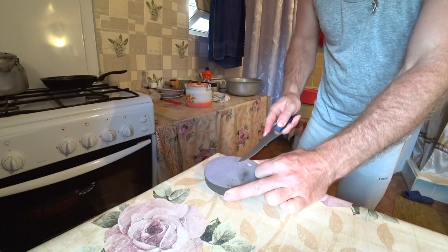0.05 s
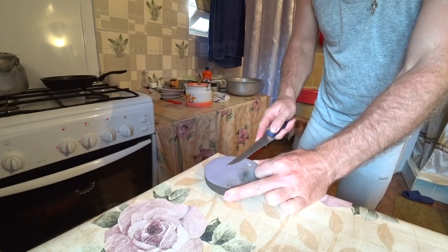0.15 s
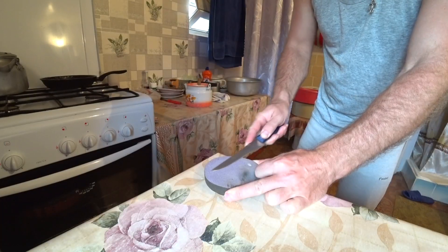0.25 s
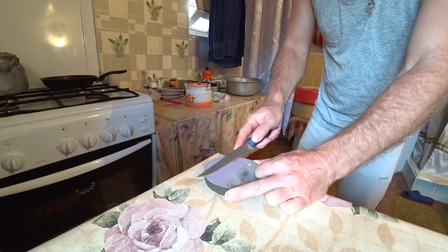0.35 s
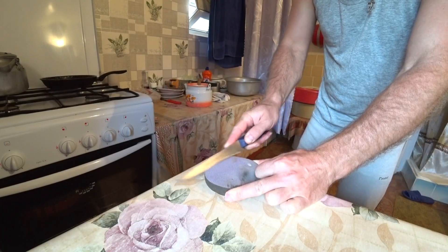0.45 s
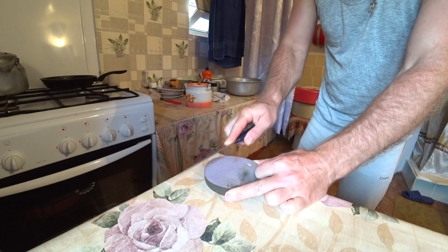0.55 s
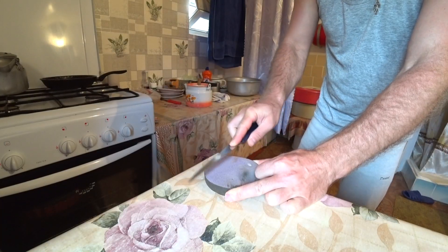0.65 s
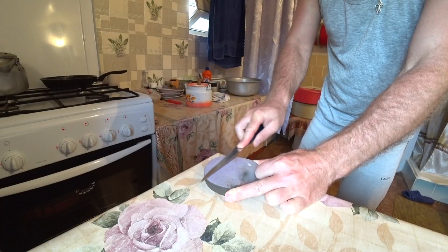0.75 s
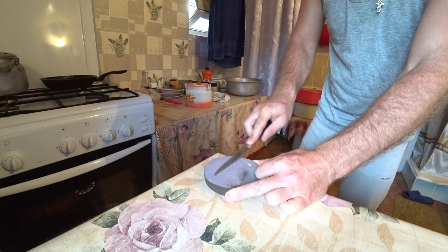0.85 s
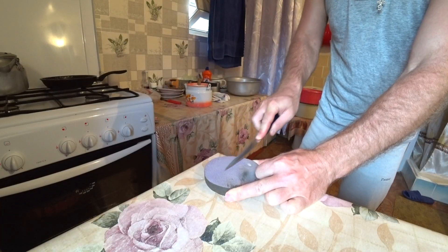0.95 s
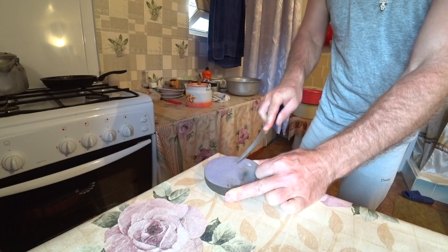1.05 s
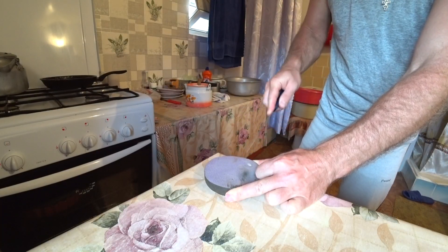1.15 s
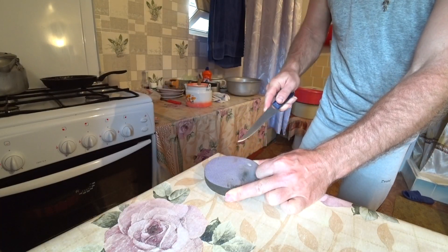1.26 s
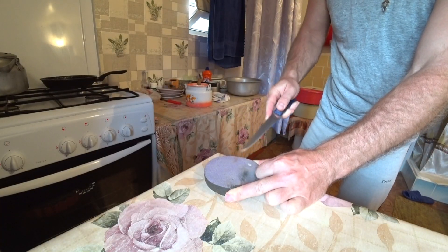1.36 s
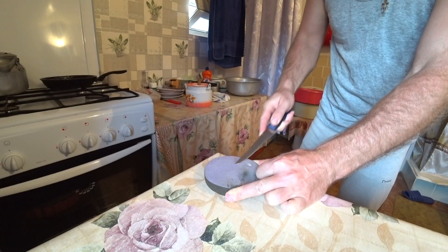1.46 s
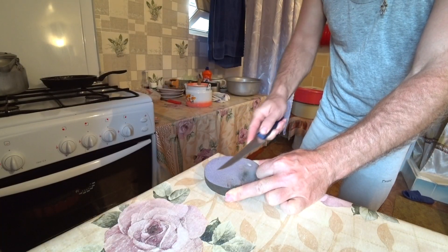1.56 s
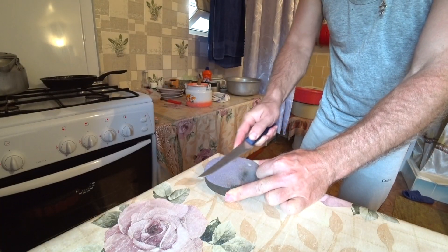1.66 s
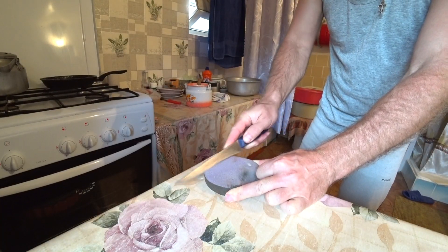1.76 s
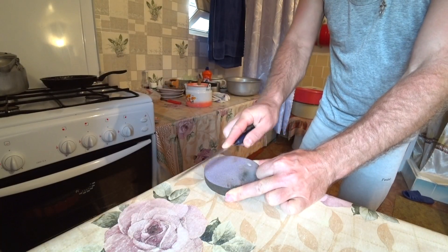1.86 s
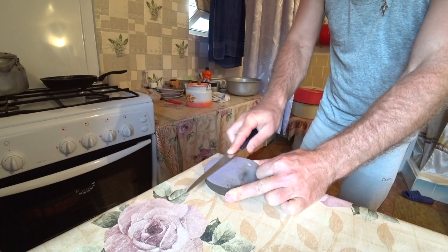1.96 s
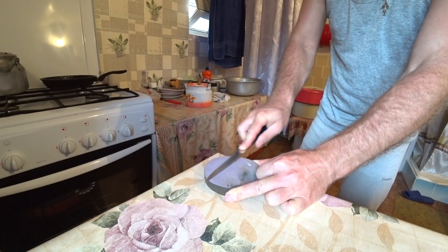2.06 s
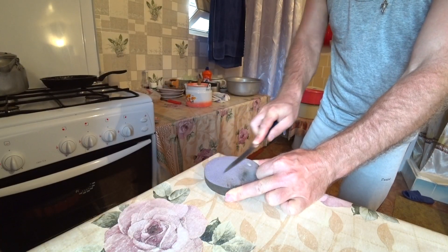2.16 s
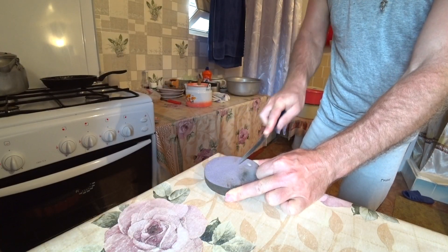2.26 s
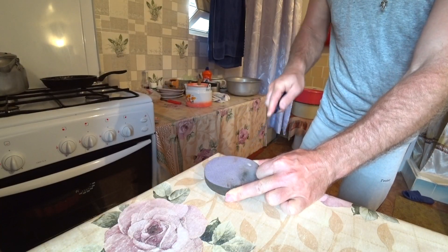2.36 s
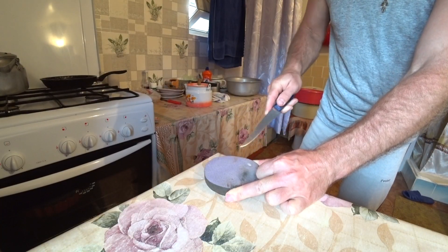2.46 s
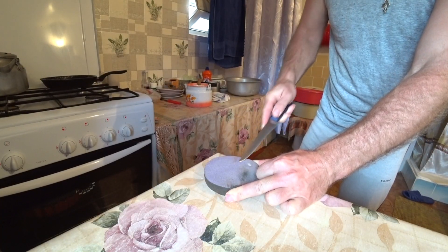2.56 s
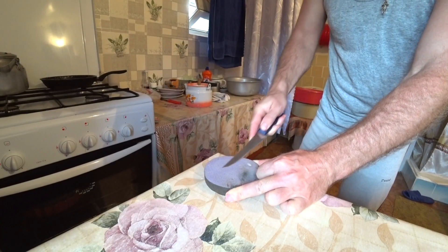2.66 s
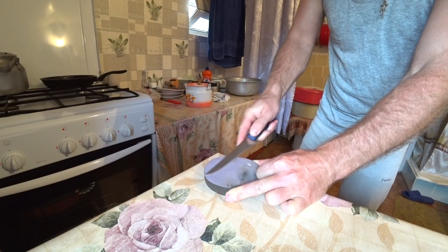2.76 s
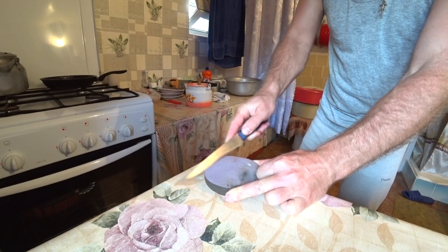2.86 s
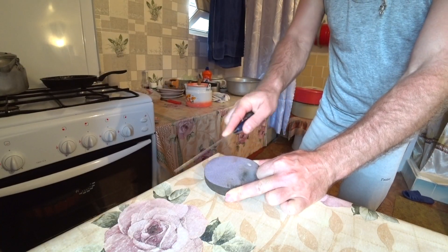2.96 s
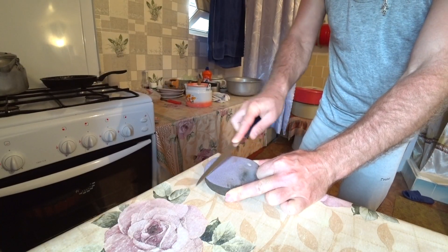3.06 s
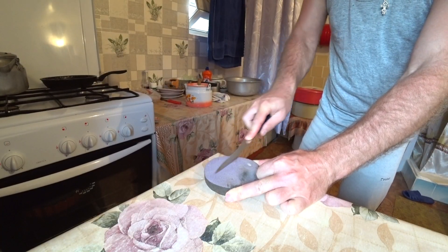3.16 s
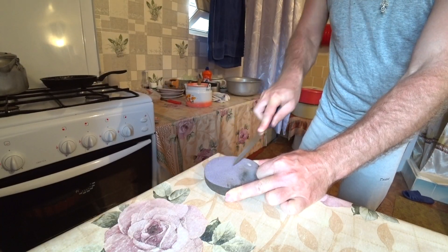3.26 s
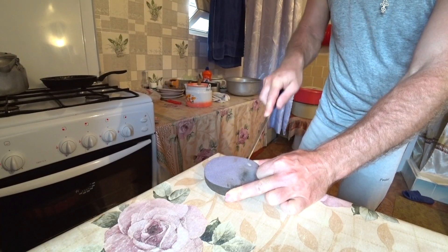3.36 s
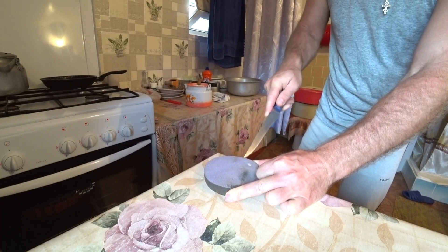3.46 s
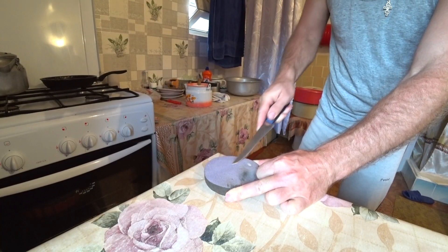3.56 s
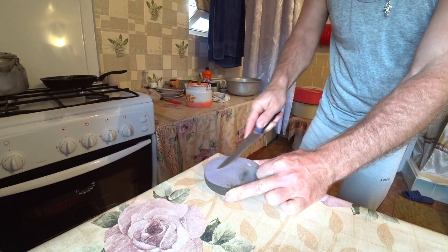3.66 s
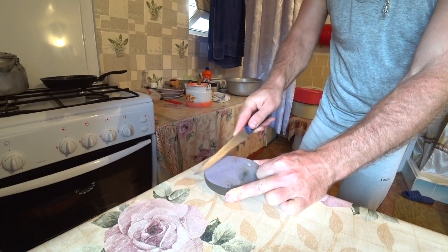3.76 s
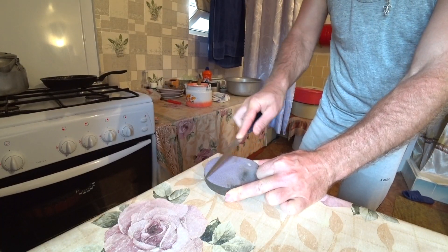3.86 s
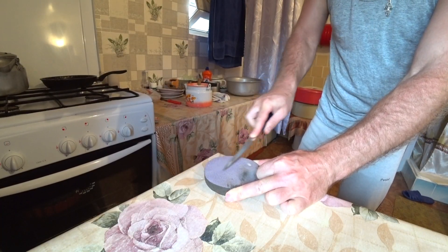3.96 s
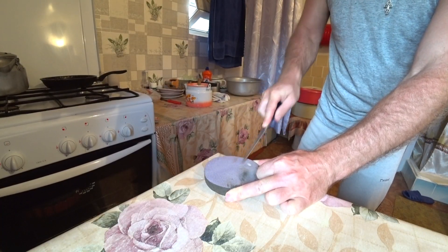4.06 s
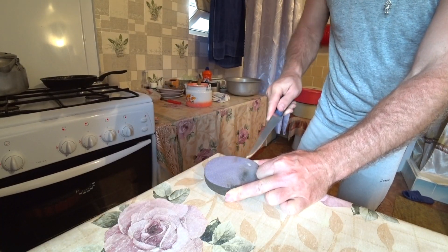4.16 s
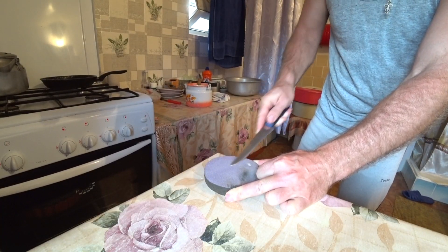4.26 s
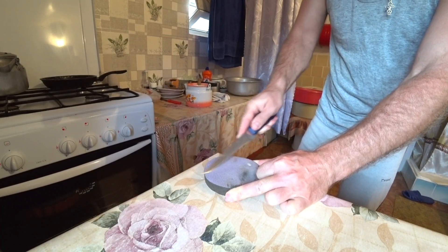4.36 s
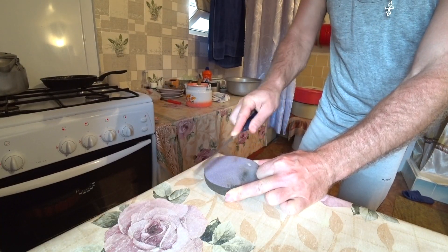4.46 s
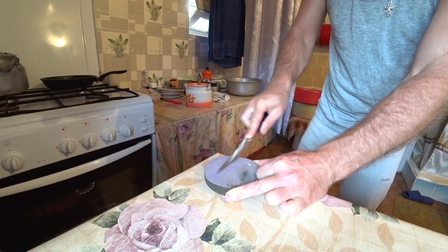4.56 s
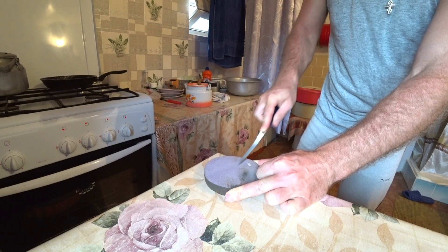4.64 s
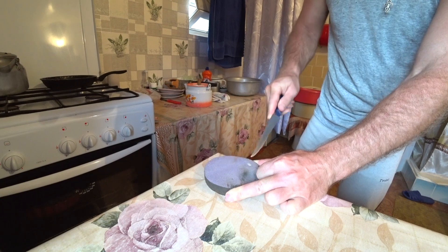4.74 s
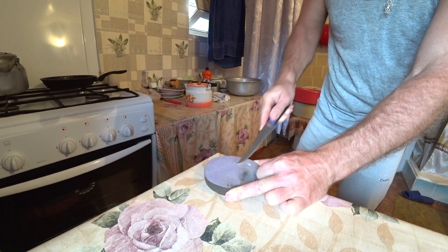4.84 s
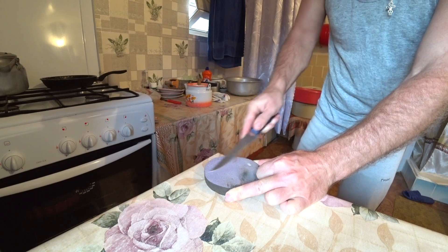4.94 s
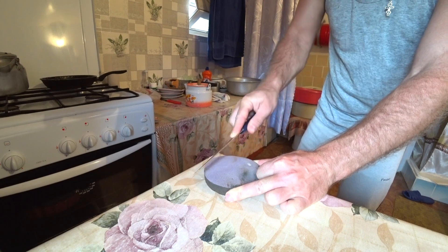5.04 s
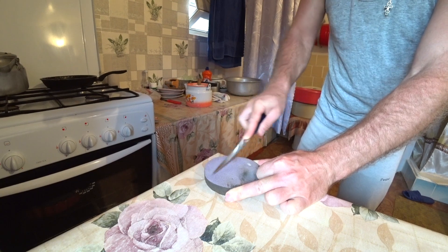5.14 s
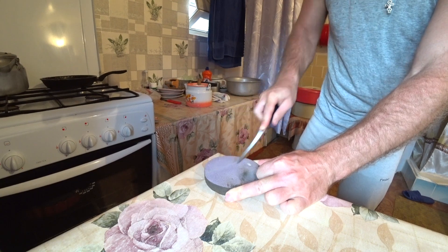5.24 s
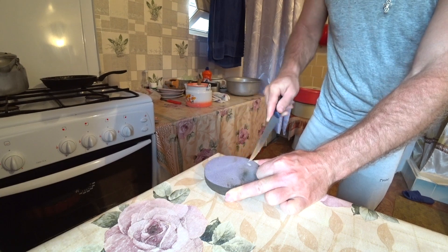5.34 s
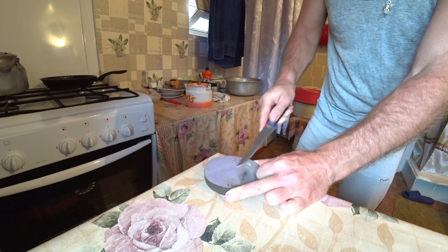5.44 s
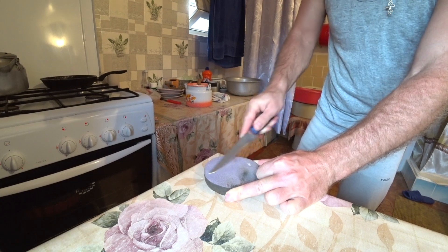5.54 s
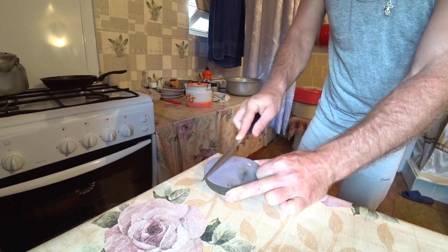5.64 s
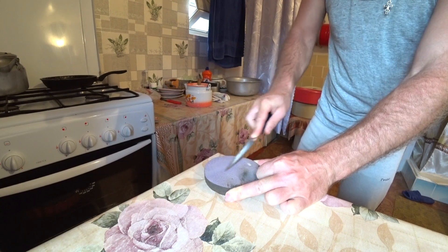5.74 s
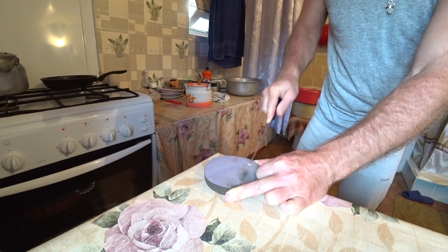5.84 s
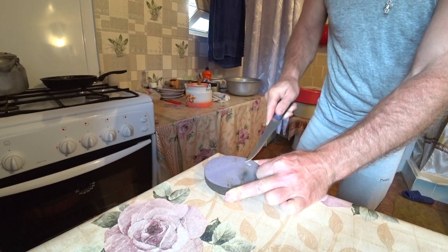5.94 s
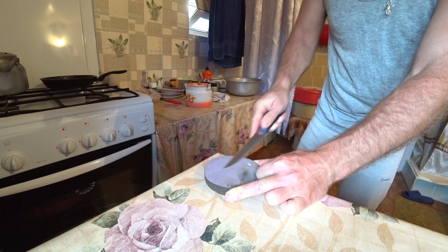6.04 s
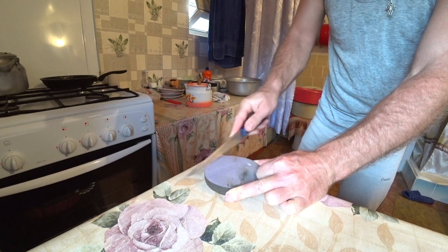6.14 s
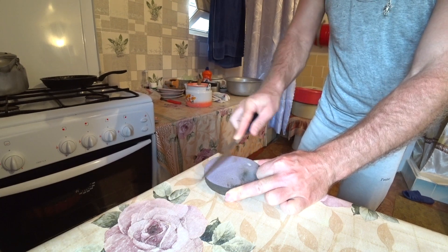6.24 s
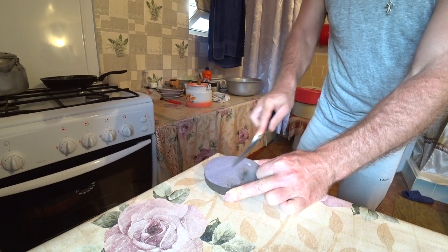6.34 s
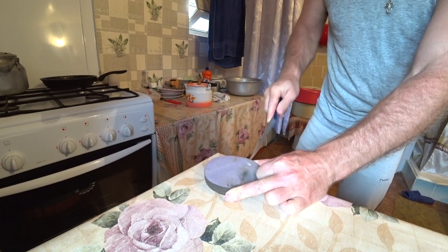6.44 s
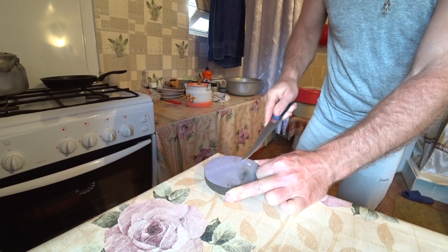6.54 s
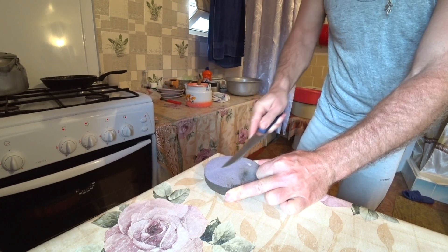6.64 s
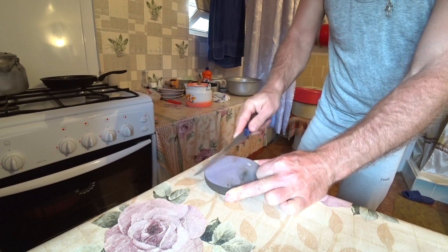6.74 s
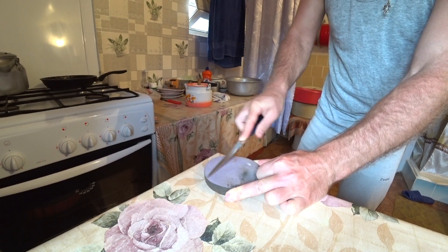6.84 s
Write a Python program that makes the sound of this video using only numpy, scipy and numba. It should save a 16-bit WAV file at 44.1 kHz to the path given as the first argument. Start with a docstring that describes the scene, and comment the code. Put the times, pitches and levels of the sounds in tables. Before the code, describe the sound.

A steel knife rasps back and forth over a sharpening stone, with sharp ticks and quickening strokes in a small kitchen.

```python
"""A steel kitchen knife drawn over a round whetstone on a cloth-covered table, push and pull in turn.
The edge lands with a tick, grit rasps it and rings the blade, large grains snap, the table rumbles
under the stone, and the tip flicks off the rim. A small tiled kitchen answers, over quiet room air
and a low hum from outside."""
import sys
import numpy as np
from scipy import signal
from scipy.fft import rfft, irfft, next_fast_len
from scipy.io import wavfile
from scipy.ndimage import uniform_filter1d
from numba import njit

SR = 44100
rng = np.random.default_rng(int(sys.argv[2]) if len(sys.argv) > 2 else 0)


def transcribe(signal):
    """Save signal, clipped to [-1, 1], as a 16-bit WAV file at the path in sys.argv[1]."""
    frames = np.atleast_2d(signal).T
    limited = np.clip(frames, -1, 1)
    pcm = np.round(limited * 32767).astype(np.int16)
    wavfile.write(sys.argv[1], SR, pcm)


N = 304290

# table resonances: pitch_hz, width_hz, level_db
TABLE_MODES = [(54.4, 28, -6.5), (111.7, 30, -7), (209, 84, -3.5), (288.3, 43, -4), (413.3, 88, -1.5),
               (491, 35.4, -0.5), (558.6, 86, -3.5), (711.4, 32, 1), (900, 170, -1)]
# whetstone resonances: pitch_hz, width_hz, level_db
STONE_MODES = [(1218, 41, 1.5), (1487, 160, 8.5), (1722, 61, 3.5), (1945, 180, 5.5), (2420, 310, 5.5)]


def undb(db):
    """Decibels to gain."""
    return 10 ** (np.asarray(db) / 20)


def unit(x):
    """Scale to rms 1."""
    return x / np.sqrt(np.mean(x ** 2))


def walk(rate_hz):
    """Random steps, smoothed twice; spread near 1."""
    hold = int(SR / rate_hz)
    steps = np.repeat(rng.standard_normal(N // hold + 1), hold)
    return 1.88 * uniform_filter1d(uniform_filter1d(steps, hold), hold)[:N]


def colour(x, spectrum):
    """Filter by (freq_hz, gain_db) points."""
    hz, db = np.transpose(spectrum)
    size = next_fast_len(N)
    bins_hz = np.arange(size // 2 + 1) * SR / size + 1
    gain = undb(np.interp(np.log(bins_hz), np.log(hz), db))
    return irfft(rfft(x, size) * gain, size)[..., :N]


@njit
def svf(x, hz, width_hz):
    """State-variable band-pass, centre gain 1; hz holds one value or one per sample."""
    y = np.empty(len(x))
    band, low, g, damping = 0., 0., 0., 0.
    for i in range(len(x)):
        if i < len(hz):
            g, damping = np.tan(np.pi * hz[i] / SR), width_hz / hz[i]
        v = (band + g * (x[i] + 1e-18 - low)) / (1 + g * (g + damping))
        band, low = 2 * v - band, low + 2 * g * v
        y[i] = damping * v
    return y


def mode(x, hz, width_hz):
    """One resonance; keeps the level of a white drive."""
    return svf(x, np.atleast_1d(1. * hz), 1. * width_hz) * np.sqrt(SR / np.pi / width_hz)


def ring(x, modes, wander_db=0.):
    """Power-normalised resonances; a moving contact feeds each unevenly."""
    total = np.sqrt(sum(undb(2 * db) for _, _, db in modes))
    feed = undb(wander_db * walk(5))
    return sum((-1) ** k * undb(db) * mode(x * np.roll(feed, 20011 * k), hz, width_hz)
               for k, (hz, width_hz, db) in enumerate(modes)) / total


def hand():
    """The hand leans in and eases. Per sample: rasp gain, rumble gain, face (0 push, 1 pull), pitch."""
    # strokes, push first: start_s, rasp_db, rumble_db, soft_start_db
    strokes = [(0.0, -29, -28, 26), (0.7, -35.5, -30, 7.5), (1.413, -27.5, -26, 15), (1.954, -29.5, -27, 8),
               (2.548, -26, -24.5, 14), (3.063, -29, -30, 1), (3.501, -28, -28, 10.5), (3.871, -26, -30, 5),
               (4.188, -28.5, -30.5, 7.5), (4.505, -26.5, -28.5, 4.5), (4.81, -24.5, -26, 15.5),
               (5.096, -24.5, -29, 9), (5.343, -29, -29, 6.5), (5.65, -28, -32, 13),
               (5.945, -26, -28, 13.5), (6.258, -24.5, -29.5, 0.5), (6.537, -28, -30.5, 5),
               (6.837, -27, -31.5, 3)]
    # pitch of the free blade beyond the contact, push then pull: stroke_share, pitch_hz
    overhang = [
        [(0, 9600), (.45, 9520), (.95, 6900)],
        [(0, 5940), (.3, 8220), (.95, 10000)],
    ]
    rasp_full_share, rasp_end_db = (0.44, 0.36), (-1.5, -5.5)  # push, pull
    rumble_full_share, rumble_end_db = (0.45, 0.54), (-1, -7.5)
    t = np.arange(N) / SR
    rasp, rumble, faces, overhang_hz = np.zeros((4, N))
    _, lifts_s = rim_flicks()
    lifts_s.append(N / SR + 0.13)
    for k, ((start_s, rasp_db, rumble_db, soft_db), lift_s) in enumerate(zip(strokes, lifts_s)):
        face, since = k % 2, t >= start_s
        on = since & (t < lift_s)
        share = (t - start_s) / (lift_s - start_s)
        lean_db = np.interp(share[on], [0, rasp_full_share[face], 1], [-soft_db, 0, rasp_end_db[face]])
        swell_db = np.interp(share[on], [0, rumble_full_share[face], 1],
                             [-0.7 * soft_db, 0, rumble_end_db[face]])
        rasp[on] = undb(rasp_db + lean_db)
        rumble[on] = undb(rumble_db + swell_db)
        faces[since] = face
        overhang_hz[since] = np.interp(share[since], *np.transpose(overhang[face]))
    return uniform_filter1d(rasp, 128), uniform_filter1d(rumble, 512), faces.astype(int), overhang_hz


def grit(rate_hz, spread_db, hiss_db, patchy_db):
    """Grains crushed at random over finer hiss; the bite of the edge comes and goes."""
    crushed = rng.random(N) < rate_hz / SR
    size = undb(spread_db * np.minimum(rng.exponential(size=N), 3))
    grains = crushed * size * np.clip(rng.standard_normal(N), -1.5, 1.5)
    hiss = undb(hiss_db) * rng.standard_normal(N)
    bite = undb(patchy_db * np.clip(walk(40) + walk(160), -4, 2.2))
    return unit(bite * (unit(grains) + hiss))


def edge_rasp(grains):
    """Grit rasps the steel edge: bright noise, rms 1."""
    # rasp spectrum: freq_hz, density_db
    spectrum = [(1180, -67), (2000, -22), (2600, -0.5), (3300, 0.5), (4110, 4), (5130, 3.5), (5710, 4.5),
                (10000, -4.5), (11000, 6), (14300, -24), (22000, -120)]
    return unit(colour(grains, spectrum))


def blade_ring(rasp, fine, flick, rim_grit, face):
    """Grit and rim ring the blade; the face in contact sets each mode's share."""
    # blade modes: pitch_hz, width_hz, push_db, pull_db, push_flick_db, pull_flick_db
    blade_modes = [(3280, 380, -2.5, -18, -7, -34), (4186, 360, -10, -5.5, 1, 3),
                   (5250, 410, 2, -12, 2, -3), (6070, 170, -6, -39.5, -48, -2), (6970, 180, -1, -1, 2, -10),
                   (7570, 310, -2, 1, -7, 1.5), (9460, 390, -33, -38, -32, -3),
                   (10230, 530, 1.5, 0, -1, -5)]
    contact = undb(2.42 * walk(6))  # the moving contact feeds modes unevenly
    out = np.zeros(N)
    for k, (hz, width_hz, *feeds_db) in enumerate(blade_modes):
        gain = undb(feeds_db) * undb(-7.5)
        grains = 0.55 * fine + 0.54 * np.roll(fine, 4001 * (1 + k))  # the edge's plus its own
        stroke_drive = rasp * gain[face] * grains * np.roll(contact, 30011 * k)
        flick_drive = flick * gain[2 + face] * np.roll(rim_grit, 4001 * k)
        out += mode(stroke_drive + flick_drive, hz, width_hz)
    return out


def sharpening():
    """Fine grit drives edge and blade, large grains the overhang, coarse grit tip, table and stone."""
    rasp, rumble, face, overhang_hz = hand()
    (steel_flick, stone_flick, tip_flick), _ = rim_flicks()
    fine = grit(rate_hz=4500, spread_db=6, hiss_db=-0.5, patchy_db=3)
    large = grit(rate_hz=400, spread_db=9.5, hiss_db=-25.5, patchy_db=4.5)
    rim_grit = grit(rate_hz=6000, spread_db=3, hiss_db=1, patchy_db=0.94)
    coarse = grit(rate_hz=900, spread_db=2.5, hiss_db=-0.6, patchy_db=1)
    edge = undb(-5.5) * rasp * edge_rasp(fine + 0.58 * large)
    rim = undb(-12) * steel_flick * edge_rasp(rim_grit)
    overhang = undb(-4) * mode(rasp * (large + 0.4 * fine), overhang_hz, width_hz=700)
    blade = blade_ring(rasp, fine, steel_flick, rim_grit, face)
    tip = mode(tip_flick * np.roll(coarse, 3001), hz=7050, width_hz=110)
    table_drive = (undb(1) * rumble + undb(-9) * stone_flick) * coarse
    stone_drive = (undb(-13) * rasp + undb(-1) * stone_flick) * np.roll(coarse, 7919)
    table = ring(table_drive, TABLE_MODES, wander_db=1.9)
    stone = ring(stone_drive, STONE_MODES, wander_db=1)
    return edge + rim + overhang + blade + tip + table + stone


def kitchen(x, length_s=0.5, gap_s=0.0023):
    """Dense echoes off the tiles: mid and side noise tails dying band by band."""
    # room decay: freq_hz, t60_s
    decay = [(100, 0.21), (700, 0.35), (4000, 0.24), (10000, 0.13)]
    # left-right difference of the room: freq_hz, gain_db
    side_spectrum = [(50, -13), (300, -8), (1500, -1.5), (2500, -0.5), (4500, -6), (9000, -5)]
    t = np.arange(int(length_s * SR)) / SR
    bands_hz = 70 * 2 ** np.arange(0, 7.5, 0.5)
    freq_hz, t60_s = np.transpose(decay)
    bands_t60_s = np.interp(np.log(bands_hz), np.log(freq_hz), t60_s)
    tails = np.zeros((2, len(t)))
    for tail, noise in zip(tails, rng.standard_normal(tails.shape)):
        for hz, band_t60_s in zip(bands_hz, bands_t60_s):
            tail += svf(noise, np.array([hz]), hz / 3) * undb(-60 * t / band_t60_s) * (t > gap_s)
    tails /= np.sqrt(np.sum(tails[0] ** 2))
    mid, side = signal.fftconvolve(x[None], tails, axes=1)[:, :N]
    return mid + colour(side, side_spectrum) * np.array([[1], [-1]])


def room_air(level_db=-51.5):
    """Steady, bass-heavy stereo noise."""
    # air spectrum: freq_hz, density_db
    spectrum = [(15, -30), (25, 7.5), (160, 0.5), (1030, -15), (2850, -23.5), (4990, -24.5), (11000, -29),
                (14300, -62), (22000, -120)]
    mid, side = colour(rng.standard_normal((2, N)), spectrum)
    return undb(level_db) * (mid + 0.52 * side * np.array([[1], [-1]])) / np.std(mid)


def outside_hum():
    """A low wavering tone from outside, with its octave."""
    # course of the hum: time_s, pitch_hz, level_db
    course = [(0, 77.3, -44.5), (.45, 84.8, -35.5), (.62, 87.4, -54), (2.3, 70.6, -68), (2.5, 67.1, -46),
              (3.0, 65.9, -44.5), (3.6, 66.5, -50), (4.002, 69.4, -72), (6.9, 66, -77)]
    time_s, pitch_hz, level_db = np.transpose(course)
    t = np.arange(N) / SR
    phase = 2 * np.pi * np.cumsum(np.interp(t, time_s, pitch_hz)) / SR
    gain = undb(np.interp(t, time_s, level_db) + 0.5 * walk(4))
    return gain * (np.sin(phase) + undb(-9.5) * np.sin(2 * phase))


def cracks(events, decay_s, width_ratio, broadband):
    """Bright noise bursts: a sharp front, then crumbling."""
    out, t = np.zeros(N + 512), np.arange(512) / SR
    envelope = np.exp(-t / decay_s) + 1.22 * np.exp(-t / 0.00021)
    for start_s, level_db, hz in events:
        burst = rng.standard_normal(512) * envelope
        burst = svf(burst, np.array([float(hz)]), width_ratio * hz) + broadband * burst
        at = int(start_s * SR)
        out[at:at + 512] += undb(level_db) * burst / np.abs(burst).max()
    return colour(out[:N], [(1500, -63), (3000, 1.5), (11000, 3)])


def grain_snaps():
    """Single large grains snap under the edge."""
    # snaps: start_s, level_db, centre_hz
    snaps = [(0.1441, -12.5, 6070), (0.19, -10, 10100), (0.2404, -7, 7900), (0.372, -21, 6770),
             (0.4194, -6, 6900), (0.7657, -19, 8720), (0.7786, -9.5, 9800), (1.0799, -13.5, 8000),
             (1.491, -7, 5240), (1.5144, -8.5, 4850), (1.5459, -9, 9630), (1.5678, -6, 7040),
             (1.5974, -9, 8600), (1.688, -3, 7240), (1.7118, -17, 6960), (2.0028, -23, 5810),
             (2.0482, -8.5, 7700), (2.3006, -11, 6900), (2.714, -4, 5000), (2.822, -16, 7040),
             (2.8397, -2, 7140), (3.1305, -7.5, 7660), (3.587, -11, 10040), (3.685, -5, 5220),
             (3.9704, -11.5, 7000), (4.0587, -6, 6150), (4.218, -3.5, 6270), (4.285, -5, 5300),
             (4.6748, -8, 7840), (4.8434, -9, 6440), (4.927, -9, 9780), (5.1294, -4, 7050),
             (5.3957, -8, 9800), (5.448, -6.5, 9740), (5.5147, -4.5, 5350), (5.7029, -19, 7540),
             (5.724, -6, 7650), (5.788, -3, 9620), (5.8087, -4, 7340), (5.9813, -6.5, 10000),
             (6.03, -3, 5150), (6.3884, -5, 6900), (6.5784, -6.5, 6100), (6.6837, -6, 10300)]
    return cracks(snaps, decay_s=0.0016, width_ratio=0.2, broadband=0.3)


def rim_flicks():
    """The tip scrapes off the rim, ending a stroke. Returns steel, stone and tip gains, and lift times."""
    # flicks: middle_s, half_length_s, steel_db, stone_db, tip_db
    flicks = [(0.443, 0.021, -20.5, -29, -30), (1.116, 0.014, -19.5, -36.5, -41.5),
              (1.752, 0.019, -21, -24.5, -33), (2.323, 0.011, -26, -51, -40),
              (2.859, 0.015, -16.5, -23.5, -34), (3.347, 0.019, -17.5, -39.5, -33),
              (3.751, 0.0092, -18.5, -28.5, -34), (4.079, 0.012, -18, -33.5, -36),
              (4.386, 0.017, -21, -22, -42), (4.694, 0.013, -16.5, -29, -24), (5.003, 0.02, -25, -20, -26),
              (5.298, 0.017, -19, -43, -30), (5.578, 0.032, -21.5, -25, -20),
              (5.833, 0.019, -16, -27.5, -30), (6.136, 0.023, -21.5, -23.5, -37),
              (6.419, 0.021, -19.5, -28.5, -24.5), (6.74, 0.016, -19, -23, -21.5)]
    t = np.arange(N) / SR
    gains, lifts_s = np.zeros((3, N)), []
    for middle_s, half_s, *levels_db in flicks:
        near = slice(int((middle_s - 2 * half_s) * SR), int((middle_s + 2 * half_s) * SR))
        pulse = np.exp(-np.abs((t[near] - middle_s) / half_s) ** 3)
        gains[:, near] = undb(levels_db)[:, None] * pulse
        lifts_s.append(middle_s + half_s)
    return gains, lifts_s


def edge_landings(tick_hz=6300, knock_decay_s=0.0037):
    """The edge lands with a tick and knocks stone and table."""
    # landings, pull first: start_s, level_db
    landings = [(0.6941, -3.5), (1.4058, -4.5), (1.95, -5), (2.542, -4), (3.058, -3.5), (3.4979, -5),
                (3.8643, -5), (4.1857, -2.5), (4.4988, -4), (4.8044, -5), (5.091, -3), (5.382, -4),
                (5.6785, -14), (5.9404, -4), (6.2521, -2.5), (6.5321, -2), (6.833, -3.5)]
    knock_db = (-17.5, -25)  # the pull lands flat, the push lightly
    blows, t = np.zeros(N + 512), np.arange(512) / SR
    for k, (start_s, level_db) in enumerate(landings):
        blow = rng.standard_normal(512) * np.exp(-t / knock_decay_s)
        at = int(start_s * SR)
        blows[at:at + 512] += undb(level_db + knock_db[k % 2]) * blow
    knocks = undb(4) * ring(blows[:N], TABLE_MODES[4:]) + undb(-1) * ring(blows[:N], STONE_MODES)
    ticks = [(start_s, level_db, tick_hz) for start_s, level_db in landings]
    return knocks + cracks(ticks, decay_s=0.0024, width_ratio=0.6, broadband=0.4)


def scene():
    """Close knife, kitchen echoes, air and hum; stereo."""
    knife = sharpening() + edge_landings() + grain_snaps()
    pan = undb([[0.2], [-0.2]])
    return pan * knife + undb(-9) * kitchen(knife) + room_air() + outside_hum()


def record(dry, threshold_db=-25.5, ratio=1.07, window_s=0.016, top_hz=11050):
    """Bass cut, gentle compression, soft clipping, treble cut."""
    x = signal.sosfilt(signal.butter(2, 35, "high", fs=SR, output="sos"), dry)
    pole = np.exp(-1 / (window_s * SR))
    power = signal.lfilter([1 - pole], [1, -pole], np.mean(x ** 2, axis=0))
    x *= np.maximum(power / undb(2 * threshold_db), 1) ** ((1 / ratio - 1) / 2)
    x = np.tanh(1.3 * x) / 1.3
    return signal.sosfilt(signal.ellip(10, 0.3, 75, top_hz, fs=SR, output="sos"), x)


dry = scene()
out = record(dry)
transcribe(out)
```